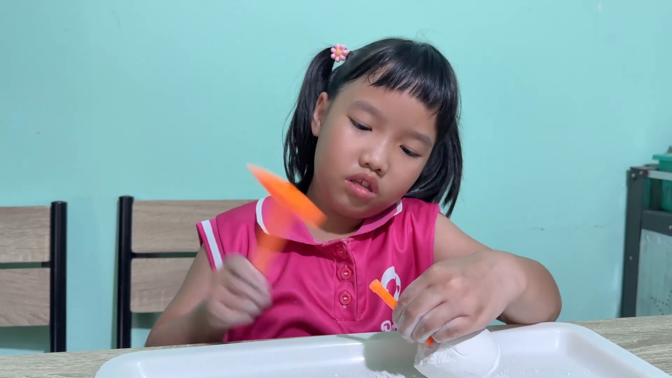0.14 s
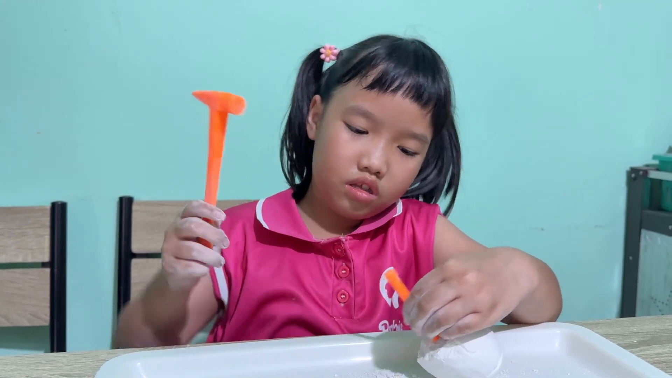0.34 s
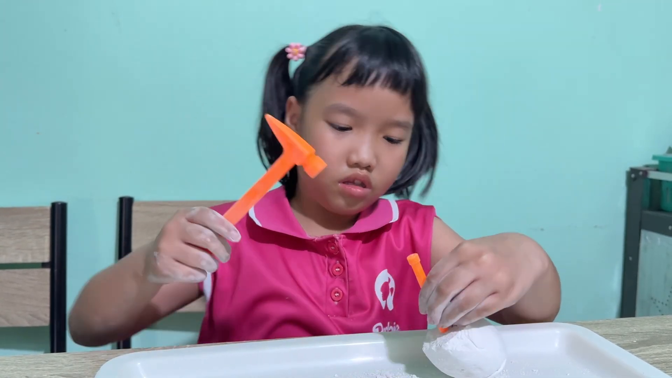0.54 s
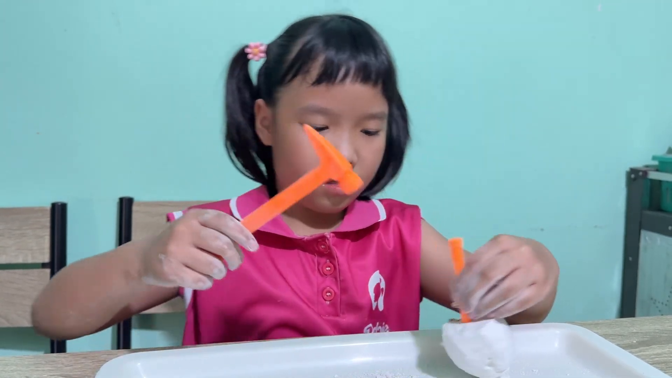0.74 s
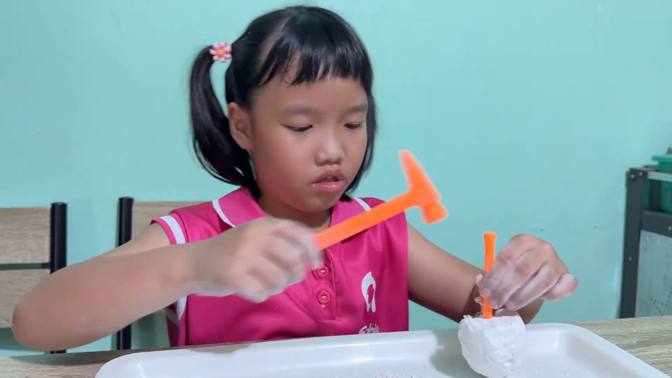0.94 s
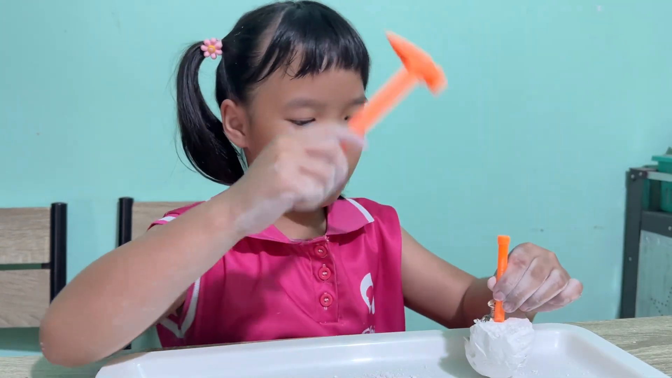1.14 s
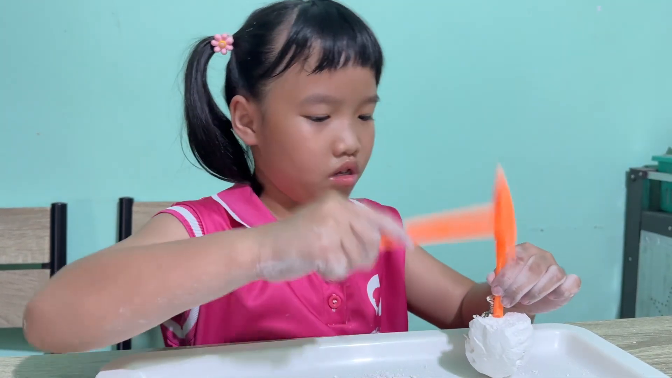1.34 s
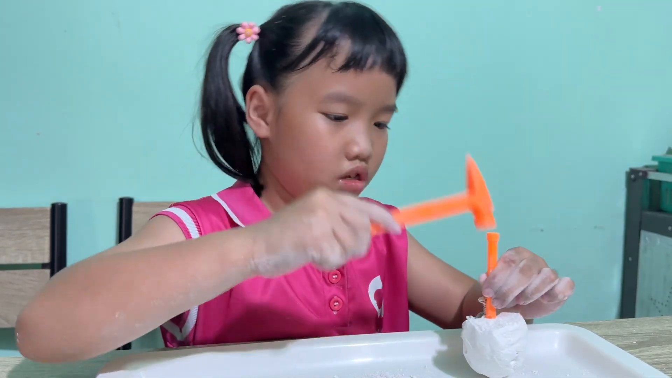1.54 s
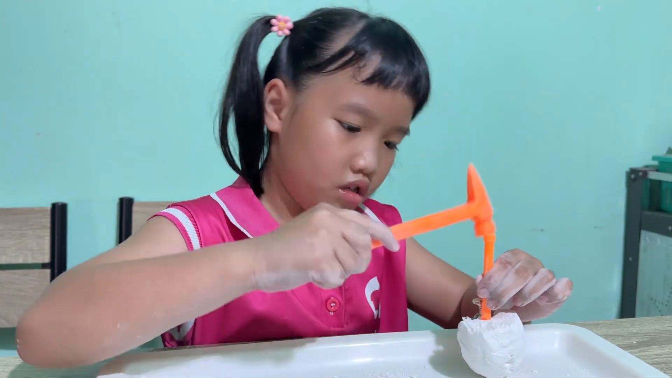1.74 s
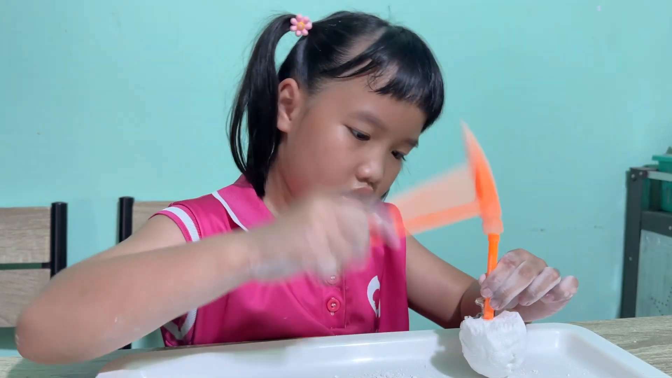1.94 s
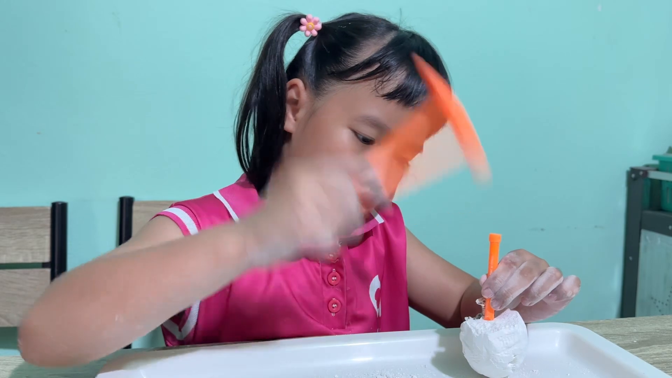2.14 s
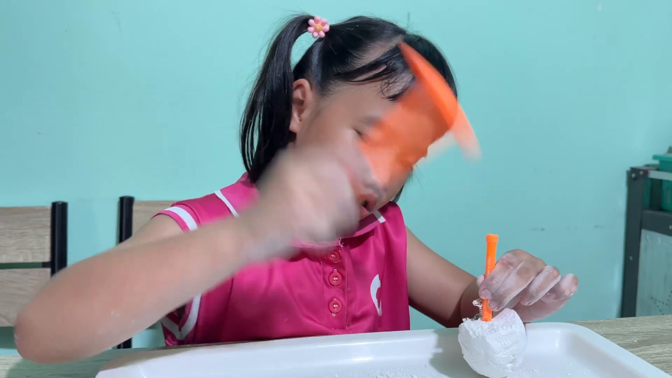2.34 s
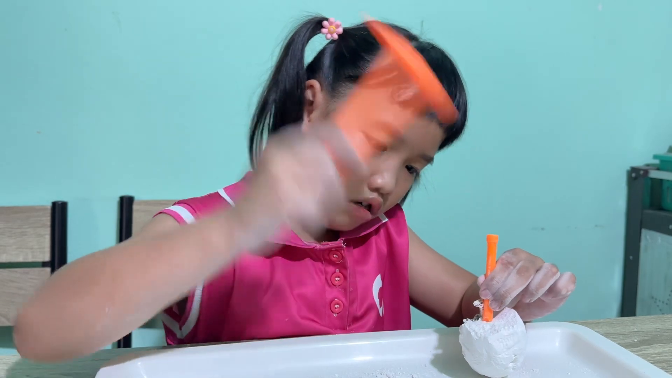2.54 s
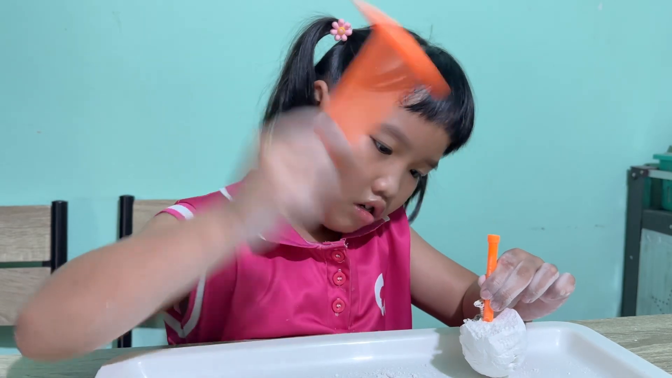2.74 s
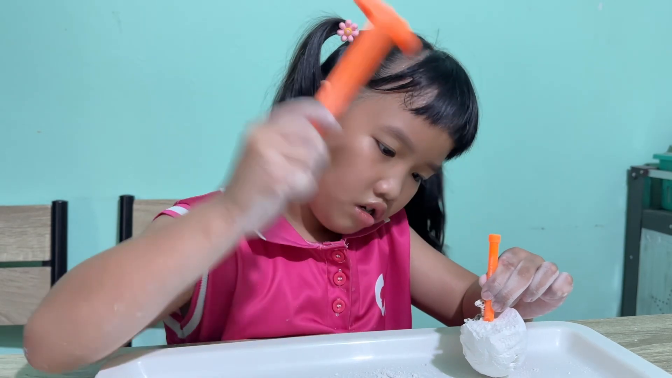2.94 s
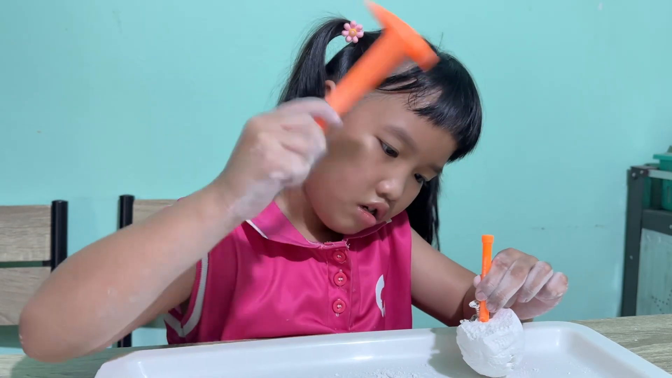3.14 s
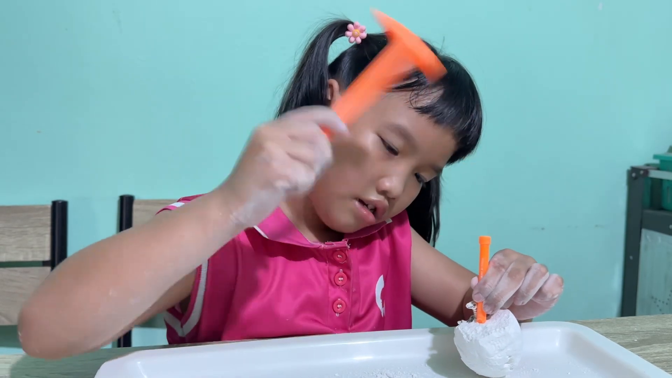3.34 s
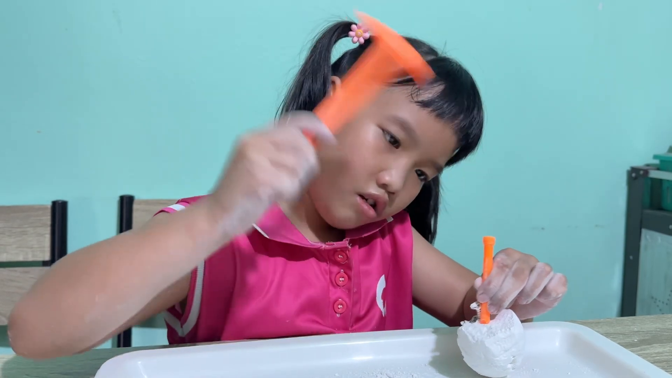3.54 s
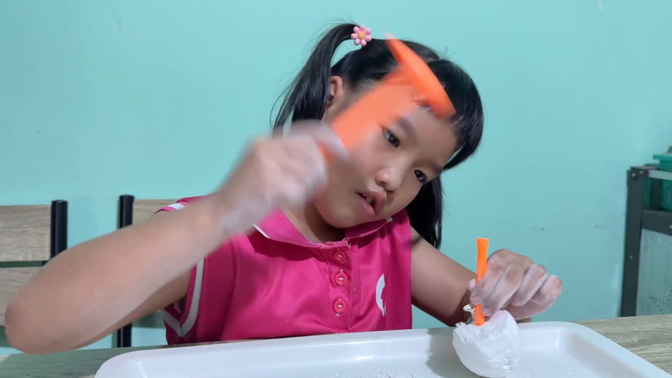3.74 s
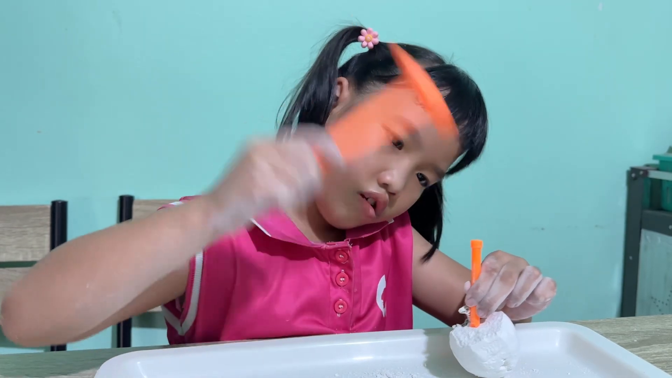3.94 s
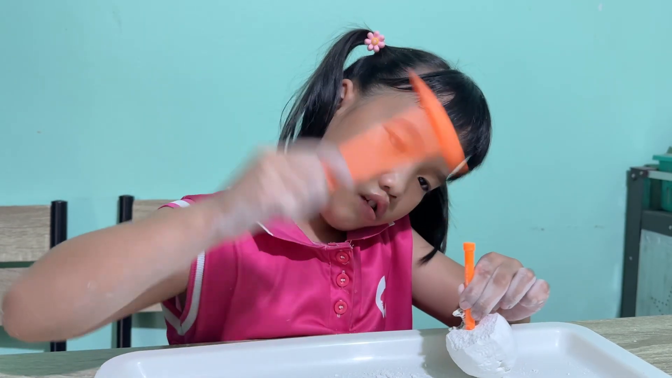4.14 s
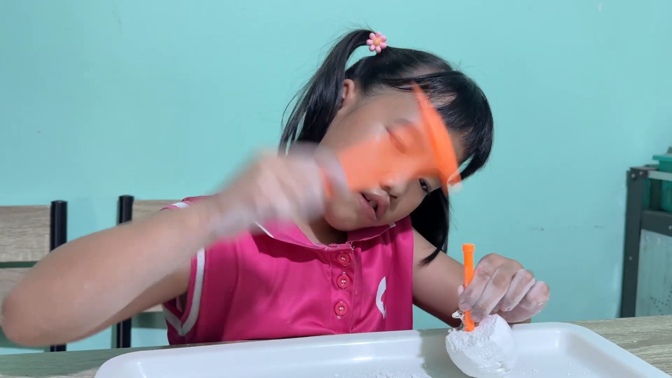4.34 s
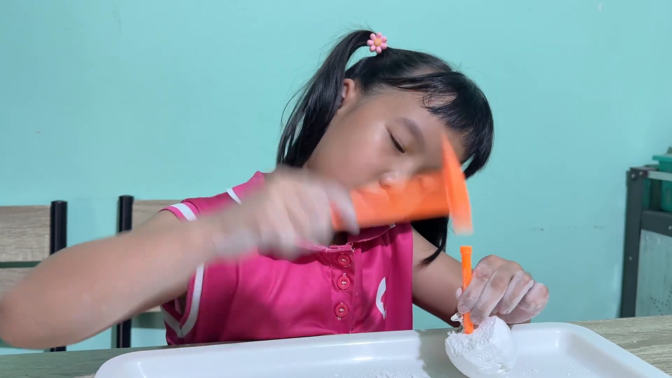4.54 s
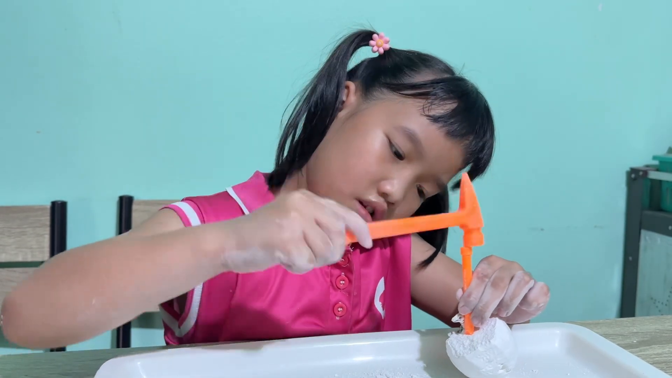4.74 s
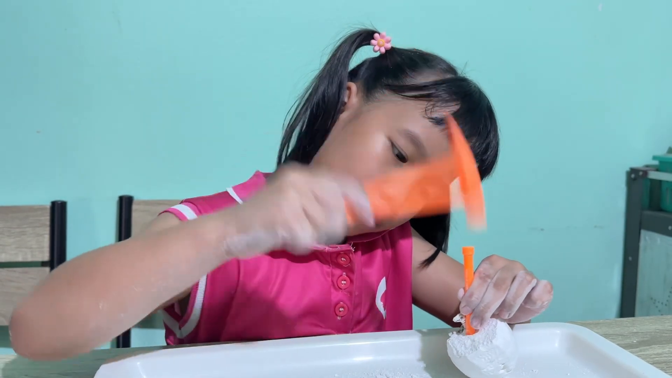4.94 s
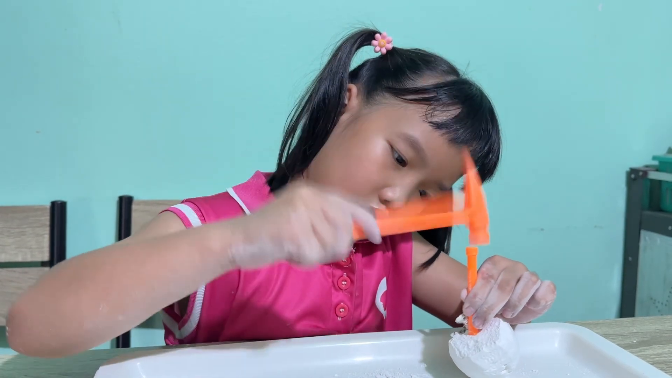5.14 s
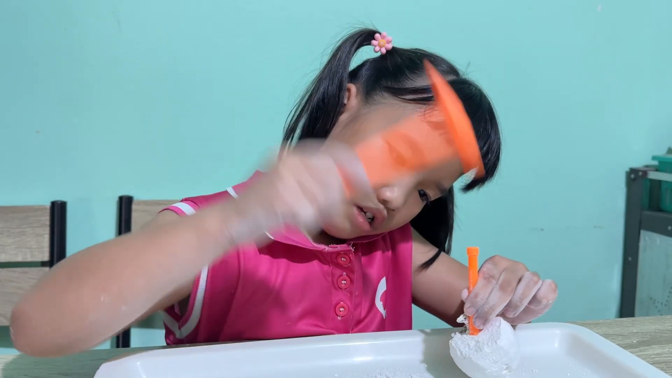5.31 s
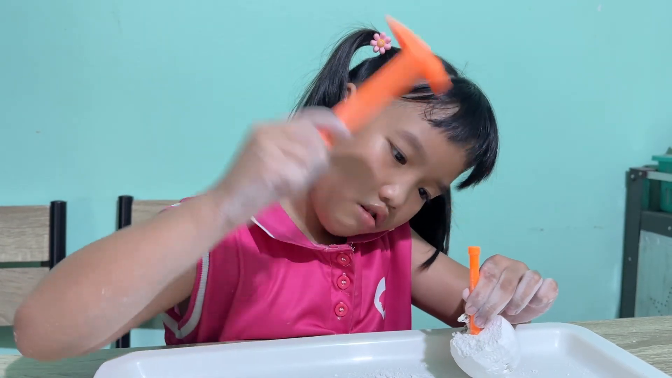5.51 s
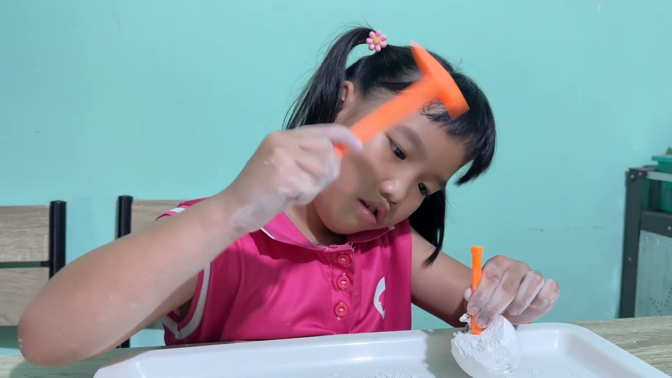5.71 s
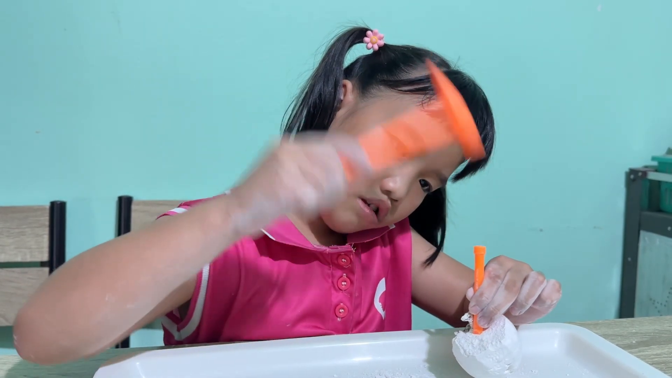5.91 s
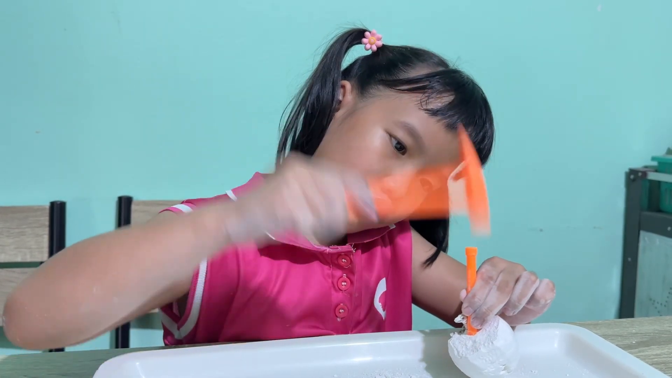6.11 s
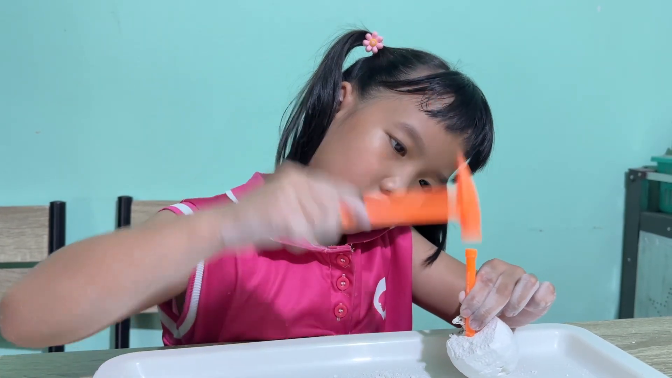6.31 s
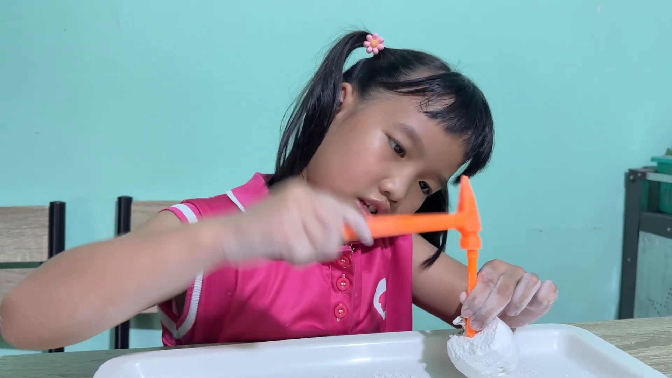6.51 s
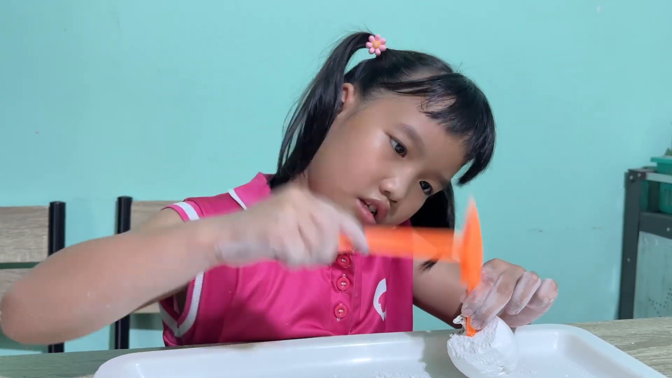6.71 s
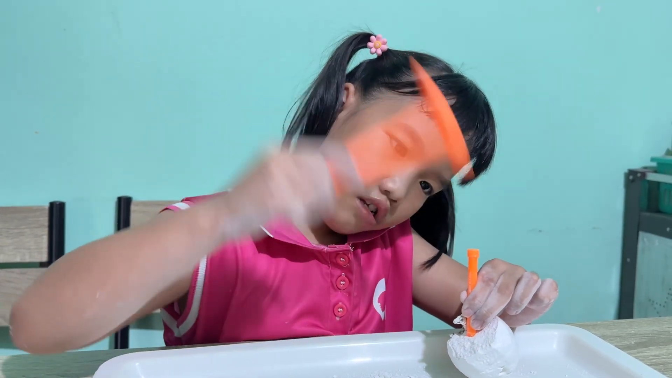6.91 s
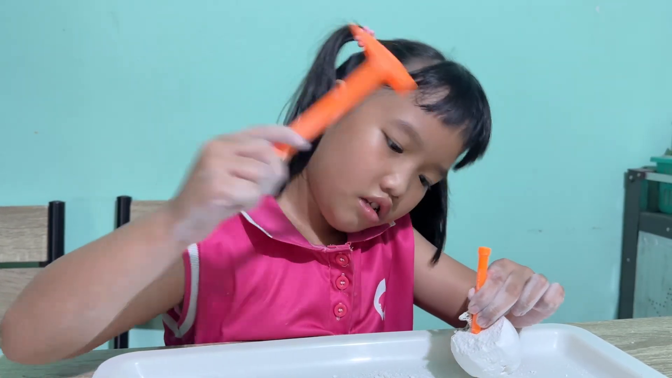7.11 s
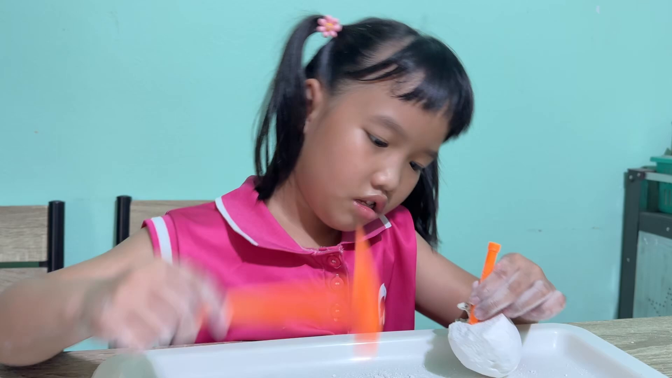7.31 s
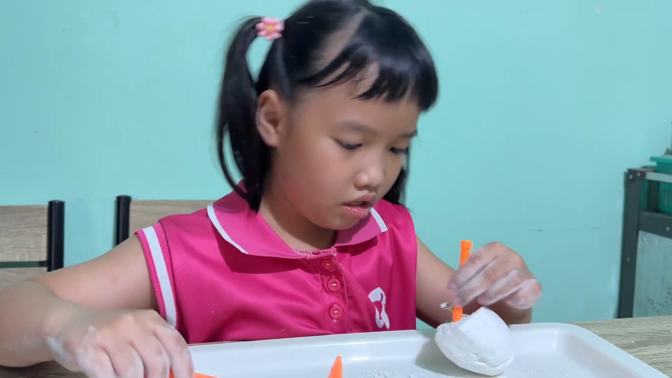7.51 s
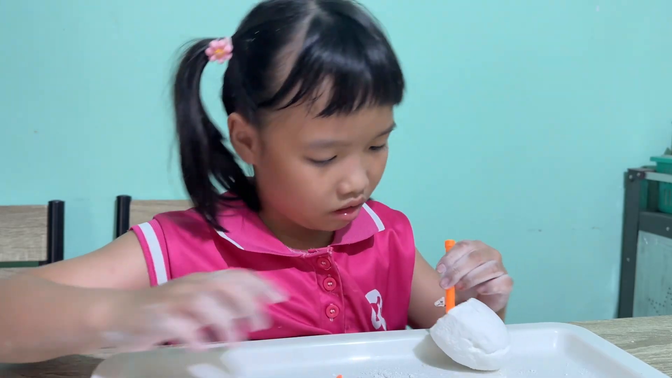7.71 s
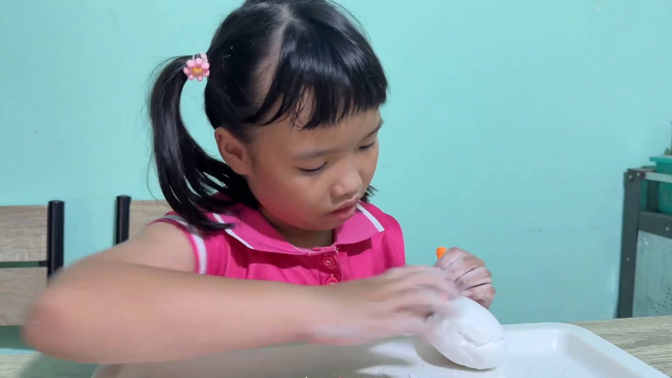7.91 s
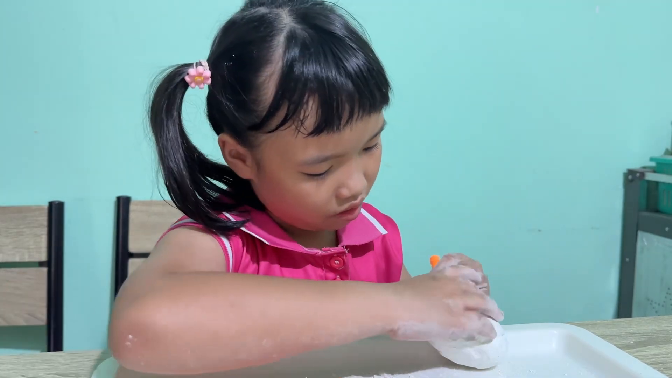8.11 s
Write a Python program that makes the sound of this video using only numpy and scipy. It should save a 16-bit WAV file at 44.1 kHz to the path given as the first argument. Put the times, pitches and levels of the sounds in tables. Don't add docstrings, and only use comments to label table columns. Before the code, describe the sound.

A toy plastic hammer strikes a plastic chisel on a plaster lump lying on a tray. Two soft taps come first, then steady runs of sharp clacks, about five a second, with brief gaps. Each has a hollow table thump and a short hard room ring. A low appliance hum continues throughout. At the end the hammer is put down with a clack and small rattle. Close stereo microphone.

```python
import sys
import numpy as np
from scipy import signal
from scipy.fft import rfft, irfft
from scipy.io import wavfile
from scipy.ndimage import uniform_filter1d

SR = 44100
rng = np.random.default_rng(int(sys.argv[2]) if len(sys.argv) > 2 else 0)


def amplitude_ratio(level_db):
    exponent = np.asarray(level_db, float) / 20
    return 10 ** exponent


def to_wav(s):
    ch = np.atleast_2d(s).T
    pcm = np.round(np.clip(ch, -1, 1) * 32767)
    wavfile.write(sys.argv[1], SR, pcm.astype(np.int16))


N = 359856

# frequency in Hz, level in dB per Hz.
AIR_SPECTRUM = [(150, -42), (250, -0.5), (303, -8), (528, -13), (1420, -23), (1670, -32), (6250, -43),
                (7980, -34.5), (8550, -70.5), (10500, -38.5), (16000, -64)]
AIR_DB = -59
# frequency in Hz, level in dB per Hz.
DEEP_SPECTRUM = [(40, 7.5), (55, -14.5), (70, -3.5), (90, -1), (130, -76.5), (16000, -99)]
# frequency in Hz, level in dB per Hz.
RUMBLE_SPECTRUM = [(40, -10.5), (90, -0.5), (150, 0), (300, -28.5), (500, -60.5), (1000, -18),
                   (16000, -57.5)]
DEEP_DB, RUMBLE_DB = -56, -55.5
# frequency in Hz, level in dB per Hz.
RUSTLE_SPECTRUM = [(60, -12), (110, 2), (180, 5), (300, -23.5), (600, -19), (1300, -34), (2500, -43.5),
                   (16000, -81)]
# frequency in Hz, left-right likeness (1 = same).
LIKENESS = [(60, 1), (130, 1), (290, 0.94), (640, -0.27), (1410, 0.13), (3100, 0.43), (6820, -1.33),
            (15000, -0.44)]
HUM_HZ, HUM_DB, HUM_PAN_DB = 49, -43.5, 3.7
TONE_HZ = 100.5
# time in seconds, level in dB.
TONE_LEVEL = [(0.0, -51.5), (1.4, -50), (1.899, -45.5), (2.75, -54.5), (3.069, -42), (3.399, -55.5),
              (4.8, -50), (5.7, -48.5), (6.2, -46.5), (6.6, -53), (7.1, -48), (8.16, -48.5)]
# frequency in Hz, level in dB.
HUM_OVERTONES = [(146, -62.5), (199.5, -63.5), (297, -70)]
# centre in seconds, level in dB, length in seconds.
LEANS = [
    (0.07, -43, 0.053),
    (4.14, -45, 0.16),
    (5.55, -48, 0.36),
    (5.9, -47, 0.13),
    (7.62, -42.5, 0.05),
]
# centre in seconds, level in dB, length in seconds.
SLIDES = [
    (1.11, -40.5, 0.043),
    (2.815, -40, 0.01),
    (3.04, -36, 0.016),
]
SHAKE_DB, SHAKE_RISE_S, SHAKE_FALL_S = -27.5, 0.015, 0.02

# start in seconds, crack peak in dB, thud in dB, bright modes in dB, edge modes in dB.
BLOWS = [(0.039, -19.5, -32.5, 0, 3), (1.5251, -21.5, -34, 0.5, -0.5), (1.7284, -11, -19.5, -5.5, -11),
         (1.954, -12.5, -22.5, -3.5, -3.5), (2.172, -11.5, -23.5, -4, -3), (2.378, -12, -23, -4, -2.5),
         (2.587, -12, -18, -3.5, -3.5), (3.02, -16, -40, -9, -4), (3.239, -12, -19, -4.5, -7.5),
         (3.4377, -11, -18.5, -6, -6.5), (3.643, -11.5, -18, -5.5, -4.5), (3.8486, -9, -15.5, -5, -8),
         (4.0662, -10.5, -17.5, -7, -7.5), (4.2755, -11.5, -18, -4.5, -5), (4.4865, -11, -16.5, -4, -3),
         (4.73, -9, -14, -7, -10.5), (4.968, -20.5, -24, -13, -5.5), (5.1505, -12.5, -16.5, -9.5, -9),
         (5.3502, -13, -19, -8, -7), (6.0451, -15, -26, -5.5, 1.5), (6.264, -9.5, -16, -4, -7),
         (6.4806, -8.5, -14.5, -5.5, -8.5), (6.9481, -12, -18, -6, -6)]
# start in seconds, crack peak in dB, thud in dB,
# brightness in dB, body pitch in Hz.
KNOCKS = [(1.3207, -37.5, -55, 4.5, 2390), (1.351, -50.5, -55, 5, 1900), (5.8132, -34.5, -50, -4.5, 1150),
          (6.6932, -41.5, -61, 13, 3320), (7.394, -20, -38, -14, 1940), (7.3981, -33, -28, -22, 2020),
          (7.596, -26.5, -32.5, 0, 1800), (7.6019, -18.5, -48, -28, 1240), (7.673, -32.5, -45.5, -19, 1280),
          (7.7412, -28.5, -41, -15, 1160), (7.802, -43.5, -50.5, -9, 1170)]
# base in dB, share of the bright dB, share of the edge dB.
TOP_RULE = (-7, 1, 0.66)
# base in dB, share of the brightness, share of the peak.
KNOCK_TOP_RULE = (-25, 0.92, -0.4)
# frequency in Hz, level in dB, T60 in seconds.
TOOL_MODES = [(1322, -11, 0.032), (1680, -6.5, 0.0088), (1938, 3.5, 0.0057), (2350, -10, 0.0065),
              (3180, 0.5, 0.0055), (3800, -12.5, 0.006), (4774, 6.5, 0.0042), (5990, 0, 0.0033),
              (7380, 7.5, 0.0016), (9790, 4.5, 0.0035), (10100, 3.5, 0.0097), (11700, 15, 0.0023),
              (14500, -2, 0.0066)]
FAMILY_EDGES_HZ = [2800, 4300, 8000]
BODY_HZ, TOOL_SPREAD_DB = 1940, 1.7
# frequency in Hz, level in dB, T60 in seconds, left-right in dB.
TABLE_MODES = [(100.8, -1.5, 0.12, -2.5), (139.8, -1, 0.25, 7), (200.9, -0.5, 0.12, 7.5),
               (240.9, -1, 0.073, -5), (265.5, -4.5, 0.1, 10), (318, -0.5, 0.073, 5),
               (355.7, -3, 0.083, 3.7), (386, -7, 0.14, 0.5), (450, -15, 0.35, 1.5),
               (499.1, -7.5, 0.094, 2.5), (526.6, 2, 0.075, 0), (595, -3, 0.045, 4), (636, -2, 0.034, -3),
               (680.3, -2, 0.049, 5.5)]
REBOUND_S, REBOUND = 0.00341, 0.59

# low edge in Hz, high edge in Hz.
SPLASH_BANDS = [(800, 2650), (2650, 4250), (4250, 7500), (7500, 16000)]
# frequency in Hz, level in dB.
ROOM_LEVEL = [(100, -17.5), (400, -7.5), (1000, -10.5), (1700, -10), (2500, -14.5), (3400, -16),
              (4800, -11), (6500, -14), (9000, -11), (12000, -10), (15000, -10)]
# frequency in Hz, T60 in seconds.
ROOM_T60 = [(100, 0.9), (500, 0.63), (1500, 0.29), (4000, 0.45), (12000, 0.34)]
# delay in seconds, width in seconds, boost in dB.
ECHOES = [
    (.0095, 0.0012, 11.5),
    (0.011, 0.00028, 6),
]
THUD_TO_WALLS_DB = -20

# start in seconds, peak in
# dB, pitch in Hz, cycles of ring.
TOUCHES = [(1.084, -45, 1160, 17), (1.115, -47, 1450, 15), (1.258, -40, 656, 14), (5.811, -34.5, 1050, 41),
           (6.6931, -30, 3800, 22), (7.3949, -30, 4160, 30), (7.411, -26.5, 1280, 12),
           (7.4, -23.5, 1960, 20), (7.489, -52, 1110, 15), (7.5956, -8.5, 3600, 14),
           (7.5959, -13, 5610, 26), (7.742, -31, 1074, 13), (7.802, -39, 1150, 12), (7.911, -49, 1900, 15),
           (8.014, -47.5, 1140, 15), (8.14, -43, 1060, 15)]
# seconds per 20 dB of decay, level in dB.
RATTLE = (0.13, -43)
RATTLE_S, RATTLES_PER_S = 7.6, 1100
# frequency in Hz, level in dB, T60 in seconds.
TRAY_MODES = [(1220, 3.5, 0.012), (2050, 3.5, 0.013), (3310, -20, 0.0097), (730, -11, 0.018)]

# frequency in Hz, left-right in dB.
PORT_TILT = [(60, -1.3), (600, -0.2), (1200, -2), (2400, -2.5), (5000, 5), (9000, 2.5), (15000, -1)]
# frequency in Hz, lag in radians.
PORT_LAG = [(20, 0), (1000, -.6), (2700, .2), (5400, .1), (6800, .9), (8300, 3), (11800, 3.3), (13800, 6),
            (20000, 6.3)]


def rms_one(x):
    return x / np.sqrt(np.mean(x ** 2) + 1e-20)


def at_hz(points, hz):
    table_hz, values = np.transpose(points)
    return np.interp(np.log(hz), np.log(np.maximum(table_hz, 1)), values)


def pan(db):
    return amplitude_ratio(np.multiply.outer([.5, -.5], db))


def drift(rate_hz):
    pole = np.exp(-80 * np.pi * rate_hz / SR)
    chance = rng.standard_normal(N // 40 + 2002)
    slow = signal.lfilter([1], [1, -2 * pole, pole ** 2], chance)[2000:]
    return np.interp(np.arange(N) / 40, np.arange(len(slow)), rms_one(slow))


def filtered(x, order, edge_hz, kind):
    return signal.sosfilt(signal.butter(order, edge_hz, kind, fs=SR, output="sos"), x)


def bands(size):
    edges = 40 * 2 ** (np.arange(27) / 3)
    white = rng.standard_normal((2, 2, size))
    for k, (low, high) in enumerate(zip(edges, edges[1:])):
        mid, side = filtered(white[k % 2], 2, [low, high], "band")
        hz = np.sqrt(low * high)
        alike = np.clip(abs(at_hz(LIKENESS, hz)), 0, 1)
        yield hz, np.sqrt(1 + alike) * mid + np.sqrt(1 - alike) * side * [[1], [-1]]


def clicks_at(times, sizes):
    out = np.zeros(N)
    samples = np.round(np.asarray(times) * SR).astype(int)
    out[np.clip(samples, 0, N - 1)] = sizes
    return out


def ring(clicks, hz, t60):
    pole, angle = amplitude_ratio(-60 / (t60 * SR)), 2 * np.pi * hz / SR
    return signal.lfilter([0, np.sin(angle)], [1, -2 * pole * np.cos(angle), pole ** 2], clicks + 1e-18)


def push(clicks, contact_s):
    force = np.sin(np.pi * np.clip(np.arange(200) / (contact_s * SR), 0, 1))
    return signal.lfilter(force / force.sum(), [1], clicks)


def by_rule(rule, first, second):
    base, first_share, second_share = rule
    return base + first_share * first + second_share * second


def hits():
    rows = []
    for s, peak, thud, bright, edge in BLOWS:
        rows.append([s, peak, thud, edge, bright, by_rule(TOP_RULE, bright, edge), BODY_HZ])
    for s, peak, thud, bright, hz in KNOCKS:
        rows.append([s, peak, thud, bright, bright, by_rule(KNOCK_TOP_RULE, bright, peak), hz])
    s, peak_db, thud_db, edge_db, bright_db, top_db, body_hz = np.transpose(rows)
    family_db = peak_db + np.array([0 * s, edge_db, bright_db, top_db])
    return s, thud_db, body_hz, family_db


def hum(db, hz, wobble_hz, flutter_db):
    phase = 2 * np.pi * np.cumsum(hz + wobble_hz * drift(3.6)) / SR
    return np.sqrt(2) * amplitude_ratio(db + flutter_db * drift(9.9)) * np.sin(phase)


def motor():
    tone_db = np.interp(np.arange(N) / SR, *np.transpose(TONE_LEVEL))
    low = hum(HUM_DB, HUM_HZ, 0.79, 1.0) * pan(HUM_PAN_DB)[:, None]
    second = hum(tone_db, TONE_HZ, 1.4, 0.6) * pan(.8)[:, None]
    return low + second + sum(hum(db, hz, 2.574, 5.1) for hz, db in HUM_OVERTONES)


def swells(rows):
    t = np.arange(N) / SR
    return sum(amplitude_ratio(db) ** 2 * np.exp(-((t - s) / length_s) ** 2) for s, db, length_s in rows)


def shake():
    s, thud_db = hits()[:2]
    t = np.arange(SR // 2) / SR
    shape = (1 - np.exp(-t / SHAKE_RISE_S)) * np.exp(-t / SHAKE_FALL_S)
    power = clicks_at(s, amplitude_ratio(thud_db + SHAKE_DB) ** 2)
    return np.abs(signal.fftconvolve(power, shape ** 2)[:N])


def background(lumpy_db=2.5, deep_shake_db=-2.5, lean_rumble_db=-8.0):
    lean, shudder = swells(LEANS), shake()
    air, deep, rumble, rustle = 0, 0, 0, 0
    for hz, noise in bands(N):
        air = air + amplitude_ratio(at_hz(AIR_SPECTRUM, hz)) * noise
        deep = deep + amplitude_ratio(at_hz(DEEP_SPECTRUM, hz)) * noise
        rumble = rumble + amplitude_ratio(at_hz(RUMBLE_SPECTRUM, hz)) * noise
        rustle = rustle + amplitude_ratio(at_hz(RUSTLE_SPECTRUM, hz)) * noise
    deep_gain = np.sqrt(amplitude_ratio(DEEP_DB) ** 2 + lean + amplitude_ratio(deep_shake_db) ** 2 * shudder)
    rumble_gain = np.sqrt(amplitude_ratio(RUMBLE_DB) ** 2 + amplitude_ratio(lean_rumble_db) ** 2 * lean + shudder)
    rumble_gain = rumble_gain * amplitude_ratio(lumpy_db * drift(8.5))
    arms = deep_gain * rms_one(deep) + rumble_gain * rms_one(rumble)
    arms = arms + np.sqrt(swells(SLIDES)) * rms_one(rustle)
    return amplitude_ratio(AIR_DB) * rms_one(air) + arms + motor()


def crack(spread_s=0.038, lag_s=.000012):
    s, _, body_hz, family_db = hits()
    chance = rng.standard_normal((len(s), len(TOOL_MODES), 2))
    out = np.zeros((2, N + 2000))
    t = np.arange(800) / SR - np.array([[0], [lag_s]])
    top_hz = TOOL_MODES[-1][0]
    for i, start in enumerate(s):
        at = round((start - .0003) * SR)
        for k, (hz, db, t60) in enumerate(TOOL_MODES):
            family = np.searchsorted(FAMILY_EDGES_HZ, hz)
            delay = spread_s / np.sqrt(hz) - spread_s / np.sqrt(top_hz)
            age = np.maximum(t - delay, 0)
            body_shift = 1 if family else body_hz[i] / BODY_HZ
            pitch = hz * body_shift * (1 + .02 * chance[i, k, 1])
            mode_db = db + family_db[family, i] + TOOL_SPREAD_DB * chance[i, k, 0]
            out[:, at:at + 800] += amplitude_ratio(mode_db - 60 * age / t60) * np.sin(2 * np.pi * pitch * age)
    return filtered(out[:, :N], 2, 950.0, "high")


def table(travel_s=0.0012, spread_s=0.036, contact_s=0.00071, spread_db=0.5, level_db=2.5):
    s, thud_db = hits()[:2]
    chance = rng.standard_normal((len(s), len(TABLE_MODES)))
    out = np.zeros((2, N))
    for k, (hz, db, t60, side_db) in enumerate(TABLE_MODES):
        arrival = s + travel_s + spread_s / np.sqrt(hz)
        force = clicks_at(arrival, -amplitude_ratio(thud_db + db + level_db + spread_db * chance[:, k]))
        force = force + REBOUND * np.roll(force, round(REBOUND_S * SR))
        out += pan(side_db)[:, None] * ring(force, hz, t60)
    out = filtered(out, 4, 104.0, "high")
    return np.array([push(side, contact_s) for side in out])


def splash(level_db=(20.5, 20.5, 17.0, 17.0)):
    s, _, _, family_db = hits()
    out = 0
    for k, edges in enumerate(SPLASH_BANDS):
        clicks = clicks_at(s, amplitude_ratio(level_db[k] + family_db[k]))
        out = out + (-1) ** k * filtered(clicks + 1e-18, 2, edges, "band")
    return out


def boom(low_hz=170.5, high_hz=890.0, level_db=21.0, smear_s=.02):
    s, thud_db = hits()[:2]
    lag, size = rng.random((len(s), 6)), rng.standard_normal((len(s), 6))
    times = s[:, None] + smear_s * lag
    sizes = amplitude_ratio(thud_db + level_db)[:, None] * size
    return filtered(clicks_at(times.ravel(), sizes.ravel()) + 1e-18, 2, [low_hz, high_hz], "band")


def room(x, build_s=0.0017):
    t = np.arange(SR // 2) / SR
    tail = 0
    for hz, noise in bands(len(t)):
        tail = tail + amplitude_ratio(at_hz(ROOM_LEVEL, hz) - 60 * t / at_hz(ROOM_T60, hz)) * noise
    bunches_db = sum(db * np.exp(-((t - lag_s) / width_s) ** 2) for lag_s, width_s, db in ECHOES)
    answer = 0.061 * tail * amplitude_ratio(bunches_db) * (1 - np.exp(-(t / build_s) ** 2))
    return signal.fftconvolve(x, answer, axes=1)[:, :N]


def touches():
    return sum(ring(clicks_at([s], amplitude_ratio(db)), hz, cycles / hz) for s, db, hz, cycles in TOUCHES)


def rattle():
    t20, db = RATTLE
    age = np.arange(N) / SR - RATTLE_S
    contact = (rng.random(N) < RATTLES_PER_S / SR) * (age > 0)
    clicks = contact * rng.standard_normal(N) * amplitude_ratio(db - 20 * np.abs(age) / t20)
    return sum(amplitude_ratio(mode_db) * ring(clicks, hz, t60) for hz, mode_db, t60 in TRAY_MODES)


def scene():
    small, thud = touches() + rattle(), table()
    to_walls = splash() + boom() + amplitude_ratio(-10.0) * small + amplitude_ratio(THUD_TO_WALLS_DB) * thud
    walls = room(to_walls) * pan(2.1)[:, None]
    return background() + crack() * pan(0.31)[:, None] + thud + walls + small


def low_pass(x):
    return signal.sosfilt(signal.butter(12, 17080, fs=SR, output="sos"), x)


def record(dry):
    hz = np.maximum(np.arange(N // 2 + 1) * SR / N, 1)
    lag = uniform_filter1d(at_hz(PORT_LAG, hz), size=6000)
    turn = np.exp(-1j * np.multiply.outer([0, 1], lag))
    x = irfft(rfft(dry) * turn * pan(at_hz(PORT_TILT, hz)), N)
    x = filtered(x, 2, 30, "high")
    x = 0.96 * np.tanh(x / 0.81)
    mix = signal.sosfilt(signal.cheby2(8, 50, 17300, fs=SR, output="sos"), x)
    return low_pass(mix)


dry = scene()
out = record(dry)
to_wav(out)
```